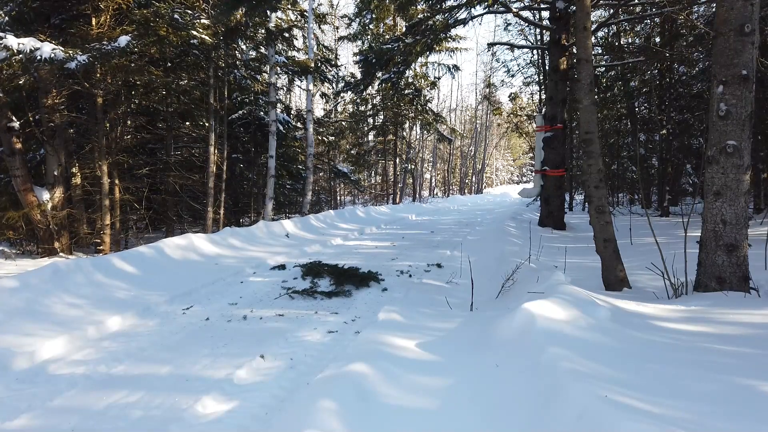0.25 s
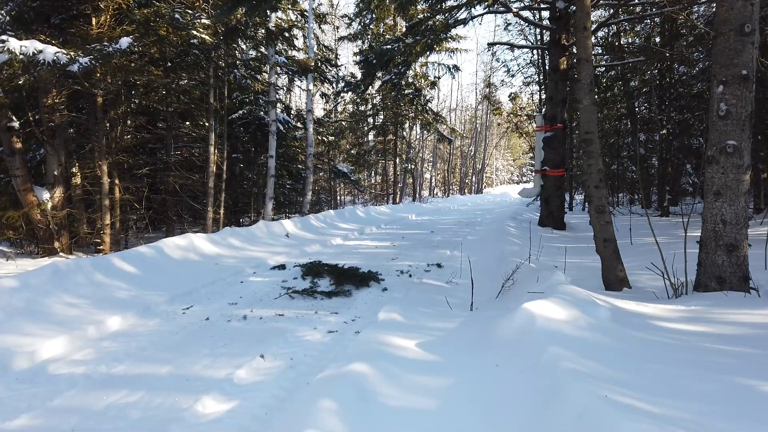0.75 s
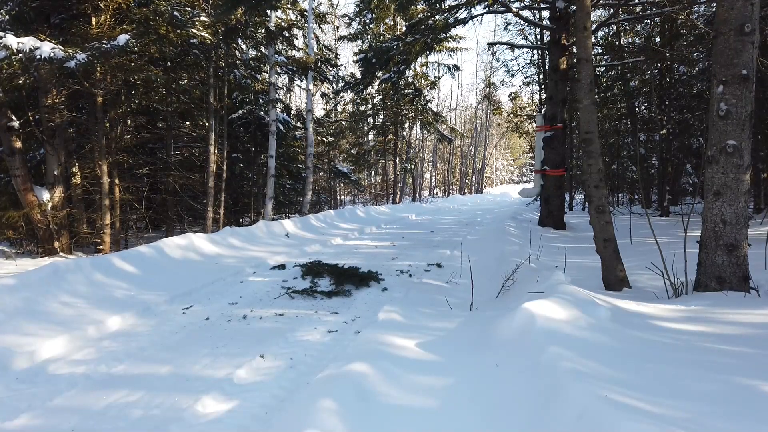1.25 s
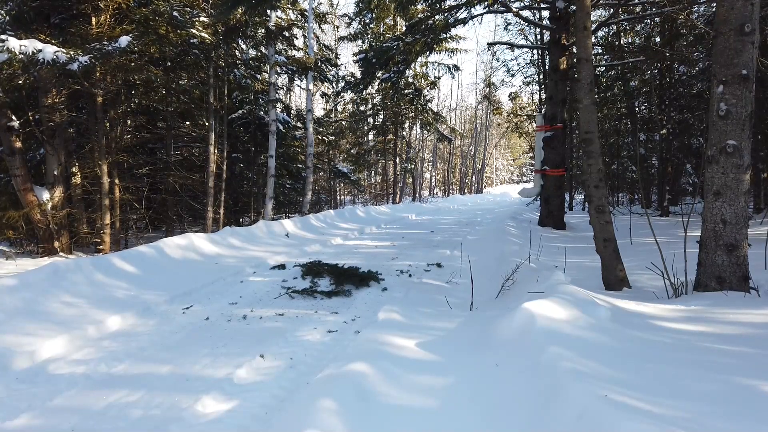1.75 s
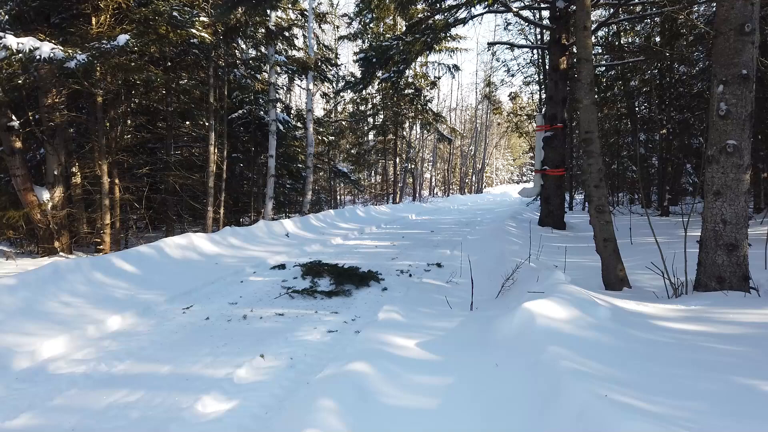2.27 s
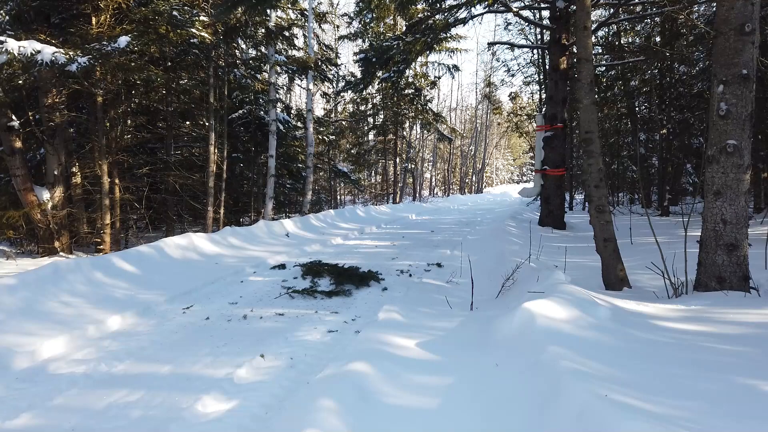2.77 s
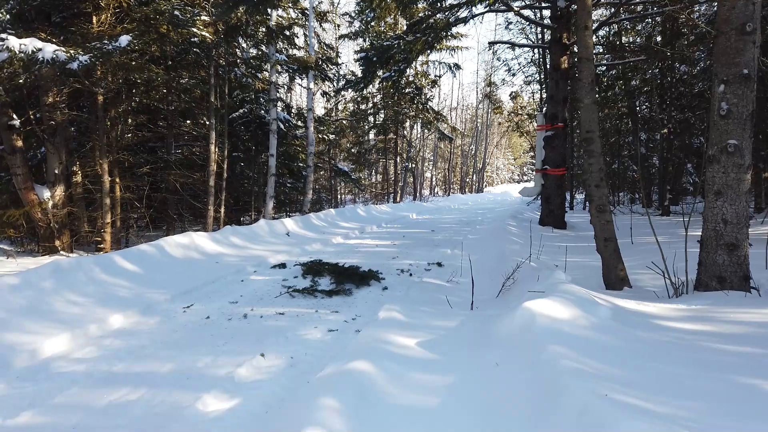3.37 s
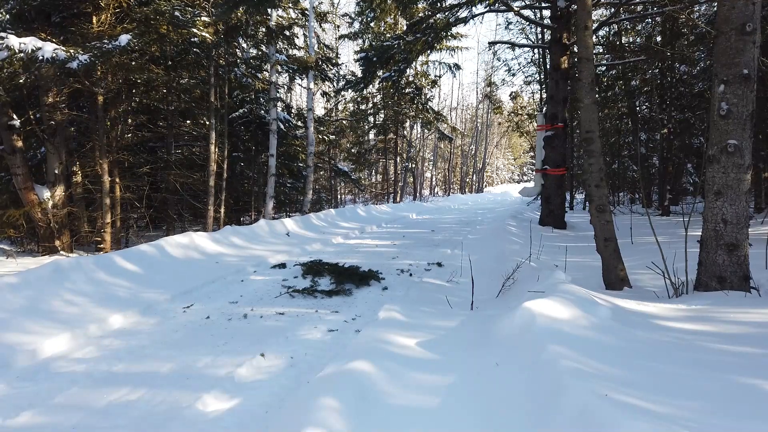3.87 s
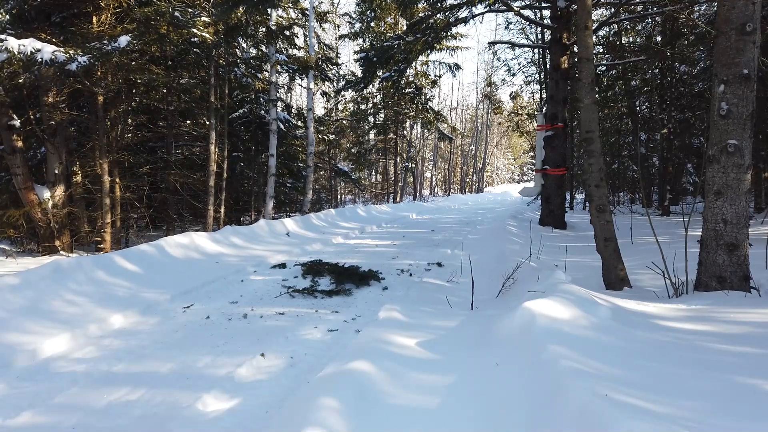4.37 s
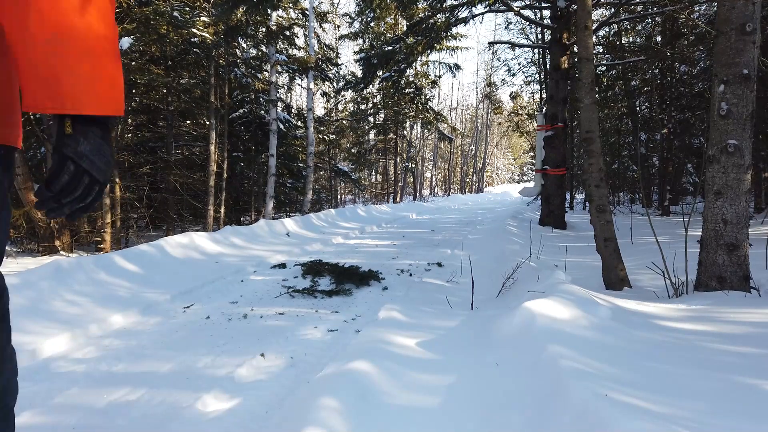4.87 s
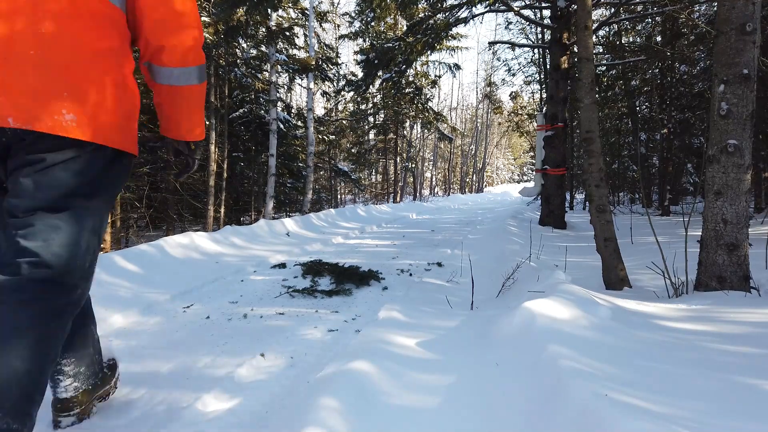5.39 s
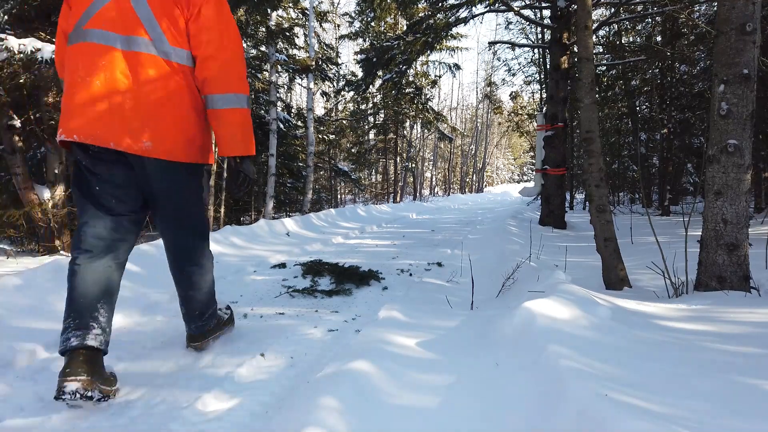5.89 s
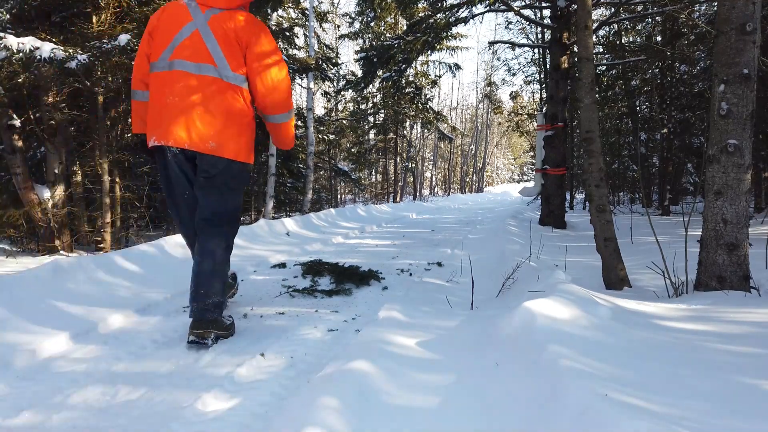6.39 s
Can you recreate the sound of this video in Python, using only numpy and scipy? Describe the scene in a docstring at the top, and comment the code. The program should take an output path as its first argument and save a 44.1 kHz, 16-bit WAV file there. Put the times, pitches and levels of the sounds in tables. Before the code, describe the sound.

A three-cylinder diesel starts fast and rough, its throttle closes, and whining gears and turbine slide down within about a second. A low, knocking idle follows, gradually louder, with soft wind rumble and one shrill dry squeak. The rhythm hiccups midway with a thud and hiss; then come sheet-metal buzzing, stronger clatter blows, a soft rustle, faint bird whistles and two snowy boot scuffs, heard from nearby in open woods.

```python
"""A three-cylinder diesel tractor with a snowblower stands on a snowy forest trail, at working speed.
The throttle closes, the turbine spools down and the engine drops to a chugging idle amid light gusts.
Metal squeaks once and the idle grows louder; then beat and levels jump once, with two noise bursts.
A panel buzzes, some clatter blows come out louder, something soft swishes by, a bird chirps, boots scuff snow.
Engine tones are sine waves tied to the crankshaft; blows, air, wind and rustles are shaped noise."""
import sys
import numpy as np
from scipy import signal
from scipy.fft import rfft, irfft, next_fast_len
from scipy.io import wavfile
from scipy.ndimage import map_coordinates

SR = 44100
rng = np.random.default_rng(int(sys.argv[2]) if len(sys.argv) > 2 else 0)


def store_wav(level_fs):
    """Save 16-bit WAV to argv[1]."""
    pcm = np.round(np.clip(np.atleast_2d(level_fs), -1, 1) * 32767)
    wavfile.write(sys.argv[1], SR, pcm.T.astype(np.int16))


N = 292824

# clatter spectrum, for the engine block and the panel: f/Hz, relative level/dB
CLATTER_SPECTRUM = [(900, -36), (1400, -7.5), (1540, -4), (1720, -6.5), (1900, -2), (2130, -3), (2480, -1),
                    (2750, 0), (3250, -1), (3450, -4), (3780, -3.5), (4000, -8), (5250, -9), (5900, -26),
                    (8000, -50)]
# blows in one four-stroke cycle: place in the cycle (0-1), then relative levels: thump/dB, knock/dB, clatter/dB
CYCLE_BLOWS = [(.07, -4, -2, -3), (.15, -14, -7, -4), (.26, 0, -7, -8), (.41, -7, 0, 0), (.49, -14, -7, -2),
               (.59, -3, -8, -7), (.735, -6, -5, -6), (.83, -14, -12, -6), (.92, -4, -7, -9)]

# start and duration in seconds
CUT_S, CUT_TAKES_S = .18, 0.072  # the throttle closes and the engine coasts without fuel
CATCH_S, CATCH_TAKES_S = 0.89, 0.36  # the governor feeds fuel again at idle
APPROACH_S, APPROACH_TAKES_S = 1.92, 2.65  # the tractor grows louder, as if creeping nearer
BEAT_JUMP_S, BEAT_JUMP_TAKES_S = 3.19, .02  # the beat and the levels jump
BEAT_JUMP_FIRINGS = .25  # the beat shifts later by this share of a firing


def amp(db):
    """Decibels to gain."""
    return 10 ** (np.asarray(db) / 20)


def unit(x):
    """Scale to rms 1."""
    return x / np.sqrt(np.mean(x ** 2) + 1e-20)


def along(points, hz):
    """Read a curve given as (Hz, value) points on a log frequency axis."""
    f, v = np.transpose(points)
    return np.interp(np.log(hz + 1), np.log(f + 1), v)


def curves(rows):
    """Join table rows with straight lines: one curve for each column after the time."""
    s, *cols = np.transpose(rows)
    return [np.interp(np.arange(N) / SR, s, c) for c in cols]


def ramp(start, length):
    """Rises from 0 to 1 over length seconds."""
    return np.clip((np.arange(N) / SR - start) / length, 0, 1)


def add(track, s, sound):
    """Mix a sound into a track at time s."""
    part = track[max(round(s * SR), 0):][:len(sound)]
    part += sound[:len(part)]


def swell(start, length, edges):
    """A smooth bump of height 1; edges is the share spent rising and falling."""
    bump = np.zeros(N)
    add(bump, start, signal.windows.tukey(int(length * SR), edges))
    return bump


def wobble(rate, count=N):
    """A smooth random curve through rate random points a second."""
    coarse = np.arange(0, count + 32, 32)  # worked out at every 32nd sample, then joined
    knots = rng.standard_normal(int(coarse[-1] * rate / SR) + 4)
    smooth = map_coordinates(knots, [coarse * rate / SR])
    return np.interp(np.arange(count), coarse, smooth)


def filtered(x, response):
    """Multiply the spectrum of x by a response that depends on frequency."""
    m = next_fast_len(N + SR // 2)
    gains = response(np.fft.rfftfreq(m, 1 / SR))
    return irfft(rfft(x, m) * gains, m)[..., :N]


def spread(pair, spectrum):
    """Two unrelated signals become coloured stereo of rms 1: mono bass, wide treble."""
    # how alike left and right are: f/Hz, correlation (1 is mono)
    likeness = [(750, .999), (1200, .945), (2300, .945), (3500, .97), (4800, .75), (5700, .3), (7000, .55),
                (9000, .4), (14000, .3)]

    def mid_side_gains(hz):
        turn = np.arccos(np.clip(along(likeness, hz), -1, 1)) / 2
        return amp(along(spectrum, hz)) * [np.cos(turn), np.sin(turn)]

    mid, side = filtered(pair, mid_side_gains)
    return unit(np.array([mid + side, mid - side]))


def narrow(turns, width_hz, pure):
    """A fuzzy tone of rms 1: a steady part plus slow noise that wobbles width_hz times a second."""
    fuzz = pure + wobble(width_hz) + 1j * wobble(width_hz)
    return unit(np.real(fuzz * np.exp(2j * np.pi * turns)))


def loudness(part, revs):
    """Level in dB of an engine part, from speed, fuel, nearness and the jump."""
    # for each part: idle level/dB, then added: at working speed/dB, coasting/dB, near/dB, after the jump/dB
    levels = { "firing tone": (-33.5, 12.2, 5, .3, 0.5), "second order": (-37.5, 8.5, -6, .5, 5),
              "upper orders": (-43.2, -4, -7, 4.8, 1.6), "thump": (-50, 8.5, -0.5, 5.8, .3),
              "knock": (-50, 9, -3.5, 6.3, .3), "clatter": (-48.8, 11, -2, 5.2, .8),
              "hiss": (-60.5, 10.5, -1, 4.5, .3), }
    idle, working, coasting, near, after_jump = levels[part]
    coast = ramp(CUT_S, CUT_TAKES_S) - ramp(CATCH_S, CATCH_TAKES_S)
    by_engine = idle + working * revs + coasting * coast
    nearness = near * ramp(APPROACH_S, APPROACH_TAKES_S)
    return by_engine + nearness + after_jump * ramp(BEAT_JUMP_S, BEAT_JUMP_TAKES_S)


def forest(x, t60, wet_db):
    """The trunks scatter a short, thin echo that falls 60 dB in t60 seconds."""
    t = np.arange(SR // 2) / SR
    tail = rng.standard_normal((2, len(t))) * amp(-60 * t / t60)
    echo = signal.fftconvolve(x[None], tail / np.linalg.norm(tail[0]), axes=1)[:, :N]
    return x + amp(wet_db) * echo


def breeze():
    """Light gusts make low noise that is unrelated at the two microphone ports."""
    # gusts: t/s, length/s, peak level/dB before a random wobble
    gusts = [(.9, .7, -48), (1.75, .45, -45), (2.35, .65, -41), (3.0, .45, -47), (5.35, 1.2, -52)]
    # wind spectrum: f/Hz, relative level/dB
    wind = [(15, -6), (35, 0), (80, -3), (200, -8), (300, -16), (600, -45), (1200, -90)]
    strength = sum(amp(db) * swell(s, length, edges=.6) for s, length, db in gusts)
    flutter = amp(1.5 * wobble(9))
    rumble = unit(filtered(rng.standard_normal((2, N)), lambda hz: amp(along(wind, hz))))
    return strength * flutter * rumble


def bird():
    """Thin whistles that rise quickly and level off."""
    # notes: t/s, length/s, start f/Hz, end f/Hz, peak level/dB before the echo
    notes = [(4.016, .04, 5900, 7500, -51), (4.105, 0.038, 5500, 7050, -48.5),
             (4.192, 0.038, 5400, 7000, -50.5), (4.283, 0.039, 5500, 6950, -49),
             (4.377, .036, 5500, 6750, -50), (5.603, 0.036, 6200, 7270, -51), (6.543, .04, 7300, 8000, -57)]
    track = np.zeros(N)
    for s, length, start_hz, end_hz, db in notes:
        rise = np.sin(np.linspace(0, np.pi / 2, int(length * SR)))
        hz = start_hz + (end_hz - start_hz) * rise
        whistle = np.sin(2 * np.pi * np.cumsum(hz) / SR)
        add(track, s, amp(db) * whistle * signal.windows.tukey(len(hz), .5))
    return track


def swish():
    """A soft treble rustle, perhaps a jacket brushing by: even noise that swells and fades."""
    # swish spectrum: f/Hz, relative level/dB
    spectrum = [(2000, -30), (4500, 0), (7000, -2), (11000, -5), (15500, -14)]
    start_s, length_s, level_db = 3.95, .6, -52
    rustle = spread(rng.standard_normal((2, N)), spectrum)
    return amp(level_db) * swell(start_s, length_s, edges=1) * rustle


def noise_bursts(grain_db):
    """Grainy noises that start quickly and fade: a squeak's splash, two at the jump, boots in snow."""
    # t/s, length/s, centre f/Hz, octaves from the centre to 6 dB down, level at the start/dB;
    # 1.862 s: a splash with the squeak; 3.197 and 3.204 s: low and treble at the jump; after 4 s: boots
    bursts = [(3.197, .045, 320, 0.91, -40), (3.204, 0.27, 10500, .5, -48.5),
              (1.862, 0.037, 4600, 1.6, -40.5), (4.609, .28, 1180, 0.42, -43.5), (5.5, .25, 640, 0.64, -47)]
    total = np.zeros((2, N))
    for s, length, hz, octaves, db in bursts:
        envelope, = curves([(s, 0), (s + 0.005, 1), (s + length / 3, .45), (s + length, 0)])
        near, far = 2 ** octaves, 8 ** octaves
        band = [(hz / far, -60), (hz / near, -6), (hz, 0), (hz * near, -6), (hz * far, -60)]
        grains = rng.standard_normal((2, N)) * amp(grain_db * wobble(300))
        total += amp(db) * envelope * spread(grains, band)
    return total


def squeak():
    """Dry metal sticks and slips, jumping between a few shrill modes."""
    # squeal parts: t/s, length/s, f/Hz, level of the basic tone/dB before the echo
    slips = [(1.843, 0.021, 3865, -25.5), (1.862, 0.027, 3930, -38), (1.856, 0.025, 4930, -39.5),
             (1.85, 0.04, 1940, -47), (1.885, .05, 3900, -49), (1.915, .028, 4600, -51),
             (1.73, 0.05, 6950, -57), (1.846, 0.041, 5790, -47.5), (1.86, 0.025, 8800, -43.5),
             (1.86, .024, 12830, -48)]
    # tones in each part: multiple of its pitch, level/dB relative to the part
    overtones = [(1, -0.5), (1.5, -23), (2, -27), (2.5, -18.5), (3, -11.5), (4, -27)]
    track = np.zeros(N)
    for s, length, hz, db in slips:
        t = np.arange(int(length * SR)) / SR
        phase = 2 * np.pi * hz * t + .16 * wobble(600, count=len(t))
        tone = sum(amp(level) * np.sin(k * phase) for k, level in overtones if k * hz < SR / 2)
        add(track, s, amp(db) * tone * signal.windows.tukey(len(t), .5))
    return track


def loud_clatter(t60):
    """Some clatter blows come out louder: each adds noise that falls 60 dB in t60 seconds."""
    # louder blows: t/s, level/dB before the shared 4.5 dB boost and the soft start
    loud_blows = [(3.679, -39), (4.525, -40), (4.865, -37.5), (4.952, -40), (5.205, -40), (5.375, -37.5),
                  (5.462, -40), (5.715, -42), (6.055, -39)]
    # their spectrum: f/Hz, relative level/dB
    spectrum = [(700, -40), (1500, -7), (1900, 4), (3250, 3), (3600, -25), (7000, -42)]
    envelope, t = np.zeros(N), np.arange(SR // 8) / SR
    soft_start = 1 - np.exp(-t / 0.0026)
    for s, db in loud_blows:
        add(envelope, s, amp(db + 4.5 - 60 * t / t60) * soft_start)
    return envelope * spread(rng.standard_normal((2, N)), spectrum)


def panel(hz):
    """Engine vibration now and then sets a sheet-metal panel ringing and chattering."""
    # buzzes: t/s, length/s, peak level of the bump/dB
    buzzes = [(3.37, 0.47, -50), (4.068, 0.071, -46), (4.84, 0.18, -55)]
    rest_db, chatter_db = -61, 2  # ring between buzzes once near; chatter relative to the bump
    buzz = sum(amp(db) * swell(s, length, edges=0.35) for s, length, db in buzzes)
    rest = amp(rest_db) * ramp(APPROACH_S, APPROACH_TAKES_S)
    chatter = amp(chatter_db) * buzz * spread(rng.standard_normal((2, N)), CLATTER_SPECTRUM)
    ring = narrow(hz * np.arange(N) / SR, width_hz=40, pure=2.5)
    return (buzz + rest) * ring + chatter


def casing(revs):
    """The engine's covers, kept going by the clatter, ring at fixed pitches that stand out at idle."""
    # ringing modes: f/Hz, level/dB relative to the clatter level at idle
    modes = [(1873, -18), (2405, -17.5), (2490, -22), (2790, -19), (2868, -17), (3360, -20), (4930, -20.5),
             (5290, -25), (8340, -48), (8920, -28), (11660, -35)]
    clatter_db = loudness("clatter", revs) - 7 * revs
    ringing = sum(amp(db) * narrow(hz * np.arange(N) / SR, width_hz=40, pure=2.1) for hz, db in modes)
    return amp(clatter_db) * ringing


def intake(revs, db):
    """The intake's roar of air is noise that fades to nothing as the engine slows to idle."""
    # intake spectrum: f/Hz, relative level/dB
    spectrum = [(1500, -30), (3500, -5), (4500, 1.5), (5800, -3), (7000, -8), (8500, -10), (12000, -38)]
    return amp(db) * revs * spread(rng.standard_normal((2, N)), spectrum)


def turbo():
    """The turbine spools down as the throttle closes, and its whistle falls and fades."""
    work_hz, idle_hz = 3400, 1102
    drop_s, spool_s = .125, .23  # start and time constant of the spool-down
    work_db, coast_db, idle_db, after_jump_db = -44.5, -56.5, -60, -67
    spin = np.exp(-np.maximum(np.arange(N) / SR - drop_s, 0) / spool_s)
    hz = idle_hz + (work_hz - idle_hz) * spin
    db = (work_db + (coast_db - work_db) * ramp(drop_s, CUT_TAKES_S)
          + (idle_db - coast_db) * ramp(CATCH_S, CATCH_TAKES_S)
          + (after_jump_db - idle_db) * ramp(BEAT_JUMP_S, .2))
    return amp(db) * narrow(np.cumsum(hz) / SR, width_hz=60, pure=1.6)


def mesh(crank, speed, revs):
    """Gear teeth whine at speed and sing out as they fall through a casing resonance."""
    # tooth tones: multiple of the firing rate, level at working speed without resonance/dB, resonance gain/dB
    teeth = [(80, -57, 16), (94, -59, 5)]
    idle_fade_db = 8  # quieter by this much at idle
    ring_hz, ring_width_hz = 4930, 330  # centre of the resonance; distance to half its gain in dB
    tones = np.zeros(N)
    for k, db, ring_db in teeth:
        ring = 1 / (1 + ((round(k) * speed - ring_hz) / ring_width_hz) ** 2)
        level_db = db - idle_fade_db * (1 - revs) + ring_db * ring
        tones += amp(level_db) * narrow(round(k) * crank, width_hz=120, pure=.8)
    return tones


def gears(crank, revs):
    """Gears, pump and fan: wavering tones tied to the crankshaft fall with the engine speed."""
    # multiple of the firing rate, then levels relative to 1.5 dB above the knock:
    # at working speed/dB, at first idle/dB, at idle after the jump/dB
    whines = [(11.3, -19, -20.5, -12), (13.33, -17, -9.5, -13.5), (15.37, -15, -13.5, -6),
              (18, -17, -13, -12.5), (20.08, -10, -24, -12.5), (20.43, -22, -18, -12),
              (26.67, -31, -17, -9.5), (27.7, -19, -14.5, -12.5), (35.7, -20, -26, -14.5),
              (53, -24, -16, -17), (67.3, -36, -9.5, -18), (69.6, -36, -24, -17), (78, -32, -20, -18),
              (80.4, -29, -10, -16.5)]
    knock_db, after_jump = loudness("knock", revs), ramp(BEAT_JUMP_S, 1.1)
    tones = np.zeros(N)
    for k, work, early, late in whines:
        idle = early + (late - early) * after_jump
        level = amp(knock_db + 1.5 + idle + (work - idle) * revs + 2.15 * wobble(7))
        tones += level * np.sin(2 * np.pi * k * crank + 0.29 * wobble(20))
    return tones


def rattle(firings, levels_db, spectrum, t60, scatter_db, jitter, fresh_db, wash_db):
    """Each blow of the cycle rings the block in its own repeating way, with a share of fresh noise."""
    t = np.arange(SR // 12) / SR
    decay = amp(-60 * t / t60) * (1 - np.exp(-t / 0.0014))
    cycles = firings / 3  # three cylinders fire in each cycle
    outside = N / SR + 1  # blows before the start or past the end are put here
    ring, power = np.zeros((2, N)), np.zeros(N)
    for (place, *_), db in zip(CYCLE_BLOWS, levels_db):
        wanted = np.arange(int(cycles[-1]) + 1) + place
        times = np.interp(wanted, cycles, np.arange(N) / SR, left=outside, right=outside)
        chance = rng.standard_normal((len(times), 2))  # for the timing and strength of each blow
        at = np.abs((times + jitter * chance[:, 0]) * SR).astype(int)
        hits = np.bincount(at, amp(db + scatter_db * chance[:, 1]), N)[:N]
        own_ring = decay * rng.standard_normal((2, len(t)))
        ring += signal.oaconvolve(hits[None], own_ring, axes=1)[:, :N]
        power += hits ** 2
    envelope = np.sqrt(np.abs(signal.fftconvolve(power, decay ** 2)[:N]))
    # part of the fresh noise follows the blows, and part is an even noise wash
    loose = (amp(fresh_db) * unit(envelope) + amp(wash_db)) * rng.standard_normal((2, N))
    density = np.sqrt(np.gradient(firings))  # more blows a second would be louder: even that out
    return spread((unit(ring) + loose) / density, spectrum)


def block(firings, revs):
    """Combustion thump, piston knock, injector and valve clatter, and the hiss of moving air."""
    # spectra, each: f/Hz, relative level/dB
    thump_spectrum = [(120, -28), (200, -7), (205, -9), (269, -9.5), (394, -2.5), (441, -6.5), (533, -0.5),
                      (620, -8), (810, -45), (1360, -120)]
    knock_spectrum = [(340, -35), (580, -8.5), (717, -1), (818, -5), (965, -6.5), (1140, -7.5),
                      (1600, -13.5), (2080, -47), (3520, -120)]
    hiss_spectrum = [(4000, -31), (5600, 0), (6500, -6), (7600, -5.5), (8600, 1.5), (9500, -4.5),
                     (11500, -2.5), (12300, -11.5), (15500, -14.5)]
    _, thumps, knocks, ticks = np.transpose(CYCLE_BLOWS)
    # t60 and jitter are in seconds
    thump = rattle(firings, thumps, thump_spectrum, t60=0.024, scatter_db=0.65, jitter=.00006,
                   fresh_db=-3, wash_db=-6.5)
    knock = rattle(firings, knocks, knock_spectrum, t60=.045, scatter_db=1.3, jitter=.00003,
                   fresh_db=-6, wash_db=-8)
    clatter = rattle(firings, ticks, CLATTER_SPECTRUM, t60=0.06, scatter_db=2.5, jitter=.00002,
                     fresh_db=-15, wash_db=0)
    flutter = amp(1.68 * wobble(150) + .3 * np.cos(2 * np.pi * firings))
    hiss = spread(flutter * rng.standard_normal((2, N)), hiss_spectrum)
    parts = {"thump": thump, "knock": knock, "clatter": clatter, "hiss": hiss}
    return sum(amp(loudness(part, revs) + 0.52 * wobble(7.9)) * sound for part, sound in parts.items())


def growl(firings, revs, db, shudder_db, shudder_s):
    """At speed, uneven firings drive rough cycle orders through the muffler; they swell as fuel is cut."""
    # muffler response: f/Hz, gain/dB before the growl is scaled to rms 1
    muffler = [(170, -20), (250, -7), (400, 0), (560, 1), (680, -5), (900, -14), (1300, -30)]
    cycles = firings / 3  # three cylinders fire in each cycle
    orders = np.zeros(N)
    for k in range(9, 42):  # multiples of the cycle rate
        strength = amp(3.2 * wobble(25.4))
        phase = rng.uniform(0, 2 * np.pi) + .5 * wobble(29.9)
        orders += strength * np.sin(2 * np.pi * k * cycles + phase)
    muffled = unit(filtered(orders, lambda hz: amp(along(muffler, hz))))
    level = amp(db + shudder_db * swell(CUT_S, shudder_s, edges=0.93))
    return level * revs * muffled


def exhaust(firings, revs):
    """One puff per firing; the muffler delays its orders unequally and stops the high ones."""
    # upper orders: multiple of the firing rate, then level relative to "upper orders": idle/dB, working speed/dB
    upper_orders = [(3, 0.5, 1), (4, 0.5, 1), (5, -5, -5), (6, -22, -3), (7, -20.5, 0)]
    # the firing tone dips briefly: t/s, length/s, deepest change/dB
    dips = [(1.22, 0.18, -4), (2.42, .2, -6), (2.764, 0.18, -4)]
    # rumble spectrum: f/Hz, relative level/dB
    rumble_spectrum = [(15, -27), (35, -2), (70, 0), (150, -4.5), (220, -10.5), (400, -36), (900, -82)]

    def order(k, db, lead=0):
        level = np.sqrt(2) * amp(db + 0.4 * wobble(20))
        return level * np.cos(2 * np.pi * k * firings + lead)

    dip_db = sum(db * swell(s, length, edges=1) for s, length, db in dips)
    first_db = loudness("firing tone", revs) + dip_db
    second_db, upper_db = loudness("second order", revs), loudness("upper orders", revs)
    upper = sum(order(round(k), upper_db + idle + (work - idle) * revs) for k, idle, work in upper_orders)
    rumble_level = amp(-47 + 8.1 * revs + 2.5 * wobble(4.5))
    rumble = rumble_level * spread(rng.standard_normal((2, N)), rumble_spectrum)
    first = order(1, first_db, lead=-0.16)
    second = order(2, second_db, lead=1.04 + 0.97 * revs)
    return first + second + upper + rumble


def scene():
    """The crankshaft drives the engine; revs is 0 at idle and 1 at working speed. The beat jumps once."""
    # engine speed: t/s, firing rate/Hz
    speed_points = [(0.0, 73.48), (0.2, 73.67), (0.56, 55.12), (0.8, 44.39), (1.0, 38.41), (1.3, 36.0),
                    (3.05, 35.56), (3.3, 35.32), (6.64, 35.35)]
    speed, = curves(speed_points)
    crank = np.cumsum(speed) / SR + .41  # counted in firings
    firings = crank - BEAT_JUMP_FIRINGS * ramp(BEAT_JUMP_S, BEAT_JUMP_TAKES_S)
    revs = np.clip((speed - speed[-1]) / (speed[0] - speed[-1]), 0, 1)
    outdoors = breeze() + forest(bird(), t60=.4, wet_db=2.0) + swish() + noise_bursts(grain_db=1.5)
    body = forest(squeak(), t60=0.13, wet_db=-11) + loud_clatter(t60=0.087) + panel(hz=1936) + casing(revs)
    spinning = intake(revs, db=-46) + turbo() + mesh(crank, speed, revs) + gears(crank, revs)
    rough = growl(firings, revs, db=-39, shudder_db=5, shudder_s=.35)
    engine = block(firings, revs) + rough + exhaust(firings, revs)
    return outdoors + body + spinning + engine


def record(dry):
    """Nothing is kept from the band limit of 15750 Hz upward."""
    return filtered(dry, lambda hz: hz < 15750)


dry = scene()
out = record(dry)
store_wav(out)
```